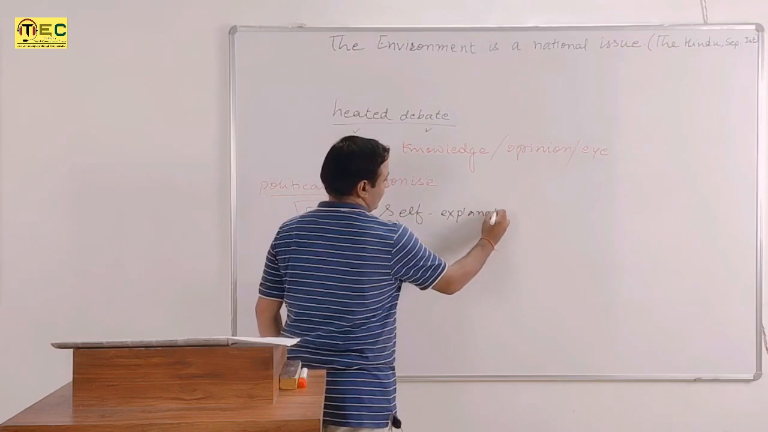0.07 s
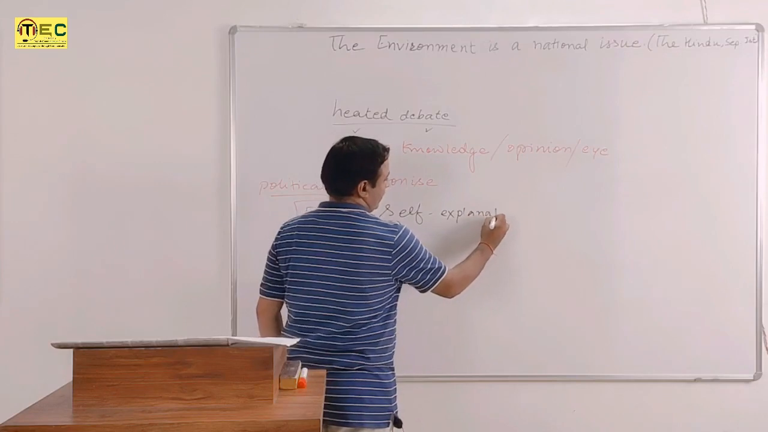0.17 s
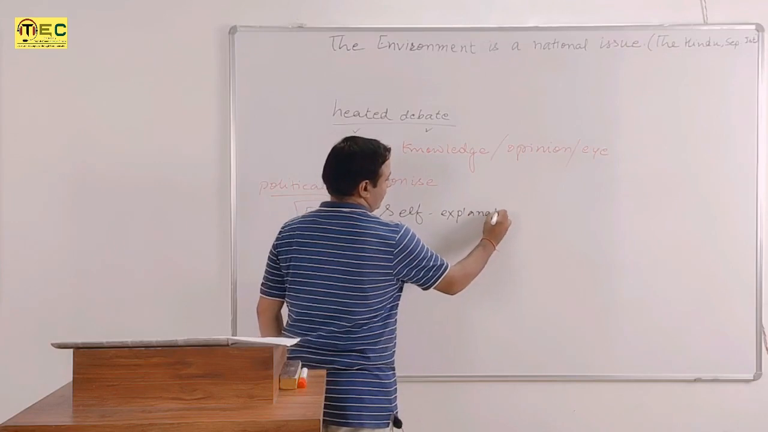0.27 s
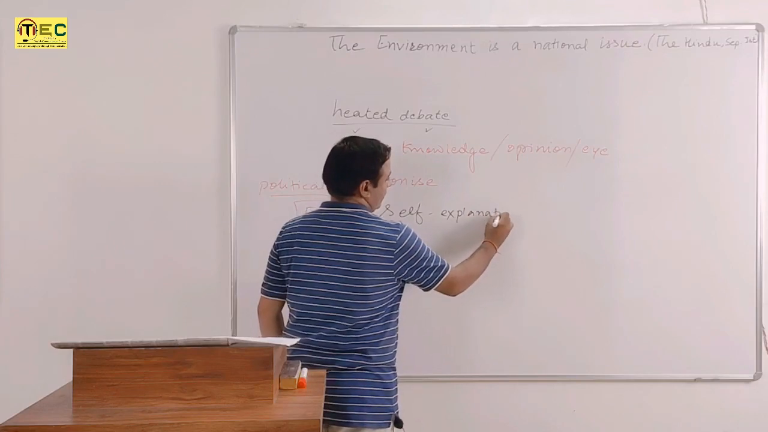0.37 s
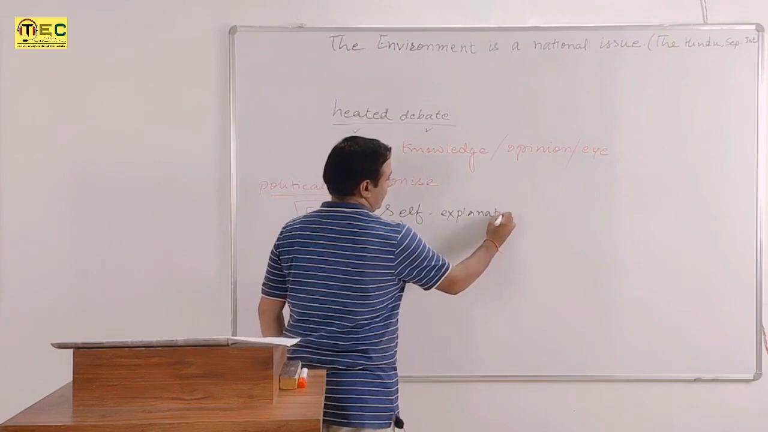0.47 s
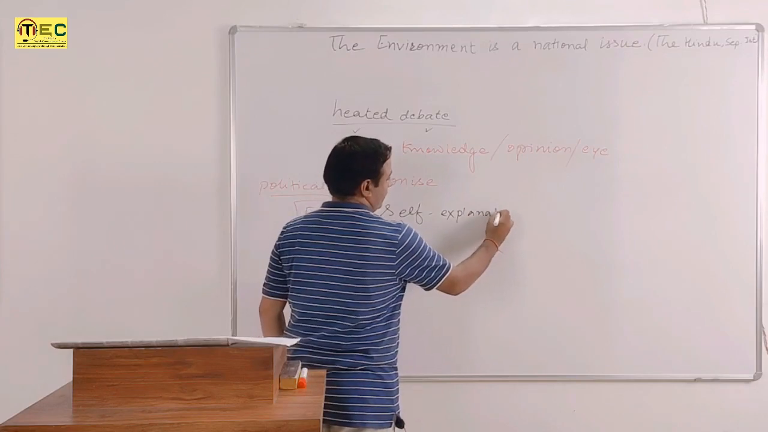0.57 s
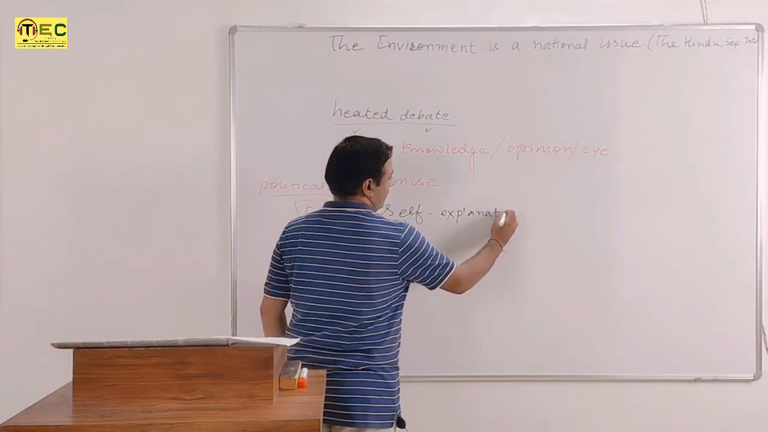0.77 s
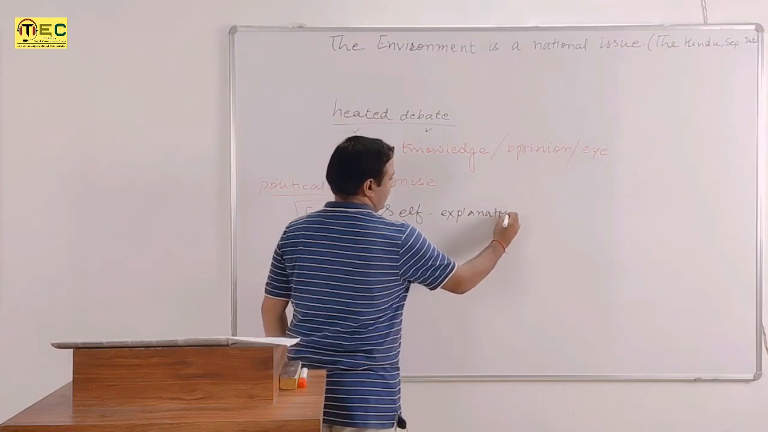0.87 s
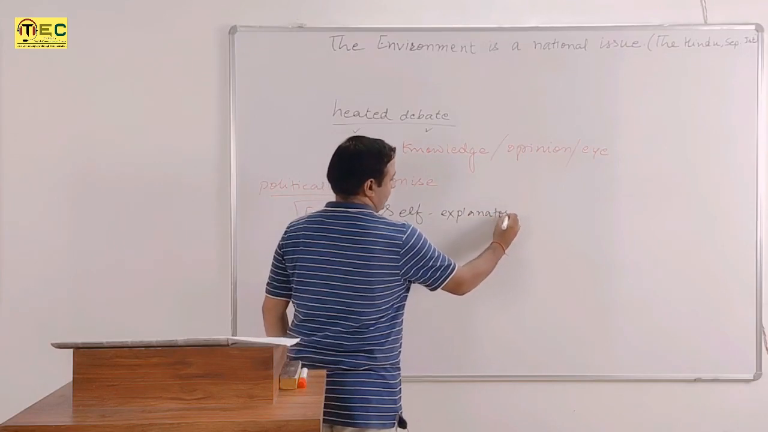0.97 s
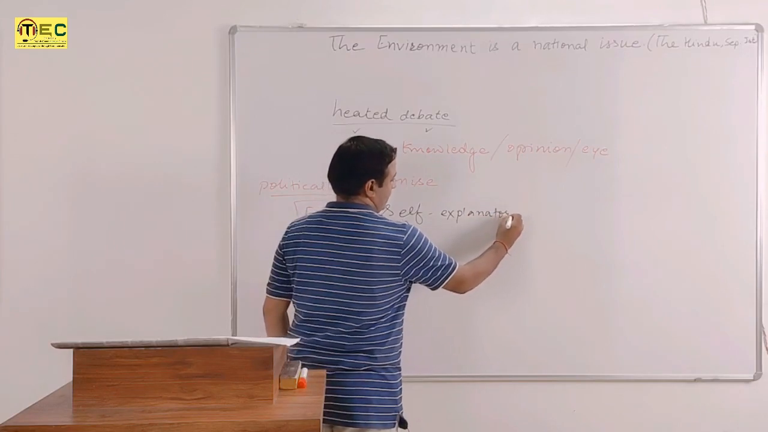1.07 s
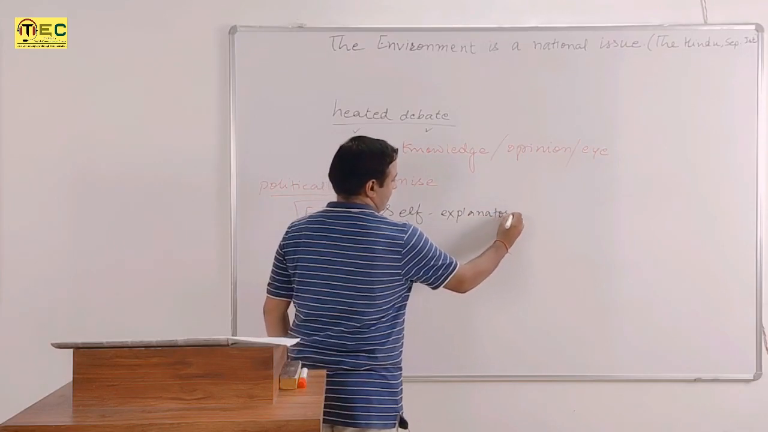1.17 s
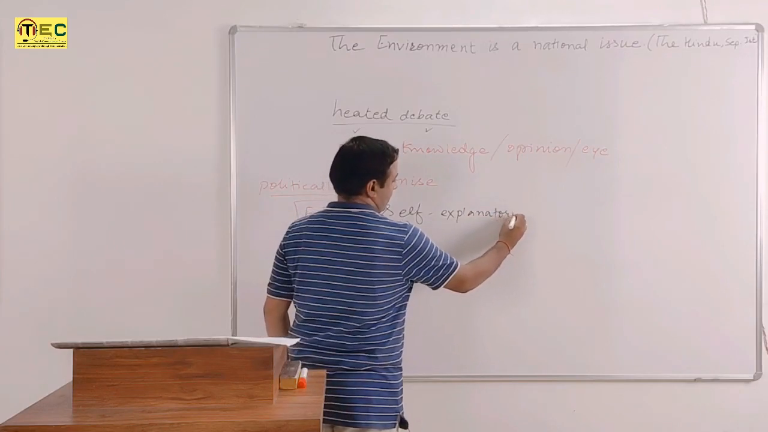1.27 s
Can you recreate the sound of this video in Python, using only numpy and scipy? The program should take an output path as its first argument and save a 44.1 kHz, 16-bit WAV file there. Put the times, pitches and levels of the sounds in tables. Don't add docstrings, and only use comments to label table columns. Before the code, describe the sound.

A felt marker writes on a whiteboard in a quiet room. A faint scratch opens; at 0.2 s the hand knocks the board with a low hollow thump, followed by a sharp plastic click at 0.25 s and soft bumps until 0.4. A light tick and scratch come at 0.5, stronger gritty strokes at 0.65-0.87, fainter ones at 0.95 and 1.29. Wavering electrical buzz and low microphone rumble lie beneath.

```python
import sys
import numpy as np
from scipy import signal
from scipy.fft import rfft, irfft, next_fast_len
from scipy.io import wavfile
from scipy.ndimage import uniform_filter1d, map_coordinates

SR = 44100
rng = np.random.default_rng(int(sys.argv[2]) if len(sys.argv) > 2 else 0)


def convert_level_to_amplitude(level_db):
    exponent = np.asarray(level_db, float) / 20
    return 10 ** exponent


def dump(signal):
    limited = np.clip(np.atleast_2d(signal).T, -1, 1)
    pcm = np.round(limited * 32767).astype(np.int16)
    wavfile.write(sys.argv[1], SR, pcm)


N = 57330


def unit(x):
    return x / np.sqrt(np.mean(x ** 2) + 1e-20)


def along(points, hz):
    f, v = np.transpose(points)
    return np.interp(np.log(hz + 1), np.log(f + 1), v)


def wobble(rate):
    return map_coordinates(rng.standard_normal(N // 16), [np.arange(N) * rate / SR])


def filtered(x, response):
    m = next_fast_len(N + SR // 2)
    return irfft(rfft(x, m) * response(np.fft.rfftfreq(m, 1 / SR)), m)[..., :N]


def resonant(x, peaks, order=3):
    def one_pass(f):
        total = 0
        for k, (centre, width, db) in enumerate(peaks):
            band = 1j * f * width / (centre * centre - f * f + 1j * f * width)
            total = total + (-1) ** k * convert_level_to_amplitude(db / order) * band
        return total

    return filtered(x, lambda f: one_pass(f) ** order)


def swell(peak, db, rise, fall):
    t = np.arange(N) / SR - peak
    return convert_level_to_amplitude(db) * np.where(t < 0, np.exp(-2 * (t / rise) ** 2), convert_level_to_amplitude(-60 * np.abs(t) / fall))


def bursts(rows):
    total = np.zeros(N)
    for s, db, hz, length in rows:
        t = np.arange(N) / SR - s
        total += convert_level_to_amplitude(db) * np.cos(2 * np.pi * hz * t) * np.exp(-(t / length) ** 2)
    return total


def room(x):
    # f/Hz, t60/s
    decay = [(200, 1), (2000, 0.1), (10000, 0.05)]
    hz, t, z = signal.stft(rng.standard_normal(SR // 2), SR, nperseg=256)
    tail = signal.istft(z * convert_level_to_amplitude(-60 * t / along(decay, hz)[:, None]), SR, nperseg=256)[1]
    return signal.fftconvolve(np.pad(x, (200, 0)), tail / np.linalg.norm(tail))[:N]


def room_air():
    # f/Hz, level/dB per Hz
    colour = [(53, -40), (90, -13), (360, -11), (690, -17.5), (1020, -19), (1320, -21.5), (1750, -25.5),
              (7330, -33.5), (16000, -39)]
    z = signal.stft(rng.standard_normal(N), nperseg=512)[2]
    patches = uniform_filter1d(uniform_filter1d(rng.standard_normal(z.shape), 10, 0), 8, 1)
    air = signal.istft(z * convert_level_to_amplitude(1.2 * unit(patches)), nperseg=512)[1][:N]
    return convert_level_to_amplitude(-69.5) * unit(filtered(air, lambda hz: convert_level_to_amplitude(along(colour, hz))))


def handling_rumble():
    # t/s, level/dB
    ride = [(0.0, -87), (0.038, -65), (0.108, -70.5), (0.14, -55), (0.188, -81), (0.225, -55.5),
            (0.306, -54), (0.34, -66.5), (0.488, -68.5), (0.524, -68.5), (0.63, -76.5), (0.72, -66.5),
            (0.934, -77.5), (1.038, -65), (1.064, -63.5), (1.14, -62.5), (1.274, -64), (1.3, -89)]
    # f/Hz, level/dB
    colour = [(10, -14.5), (25, 1), (40, -9), (70, -11), (110, -15), (200, -25), (400, -105)]
    s, db = np.transpose(ride)
    low = unit(filtered(rng.standard_normal(N), lambda hz: convert_level_to_amplitude(along(colour, hz))))
    return low * convert_level_to_amplitude(np.interp(np.arange(N) / SR, s, db))


def stand_shakes():
    # t/s, level/dB, f/Hz, length/s
    thuds = [
        (.249, -43.5, 34, .022),
        (.2575, -53, 72, .016),
        (.3, -43, 35, .0055),
        (1.075, -53.5, 31, 0.033),
        (1.132, -48.5, 29.6, 0.0085),
    ]
    return bursts(thuds)


def mains_buzz():
    # peak t/s, level/dB, rise/s, fall t60/s, centre f/Hz
    swells = [(0.036, -75.5, 0.053, 0.73, 1250), (.12, -78, 0.05, 0.32, 1200),
              (.22, -59.5, 0.063, 0.17, 904), (0.205, -75, 0.05, 0.46, 1000),
              (0.233, -68, 0.0088, 0.069, 1135), (0.56, -73.5, 0.066, 0.93, 1164),
              (0.703, -67, 0.067, 0.18, 917), (1.063, -63, 0.016, 0.1, 1105),
              (1.063, -71.5, 0.022, .3, 1200), (1.097, -62, 0.0072, 0.17, 1100),
              (1.097, -68, 0.01, 0.17, 1200), (1.097, -62, 0.015, 0.072, 1260),
              (1.13, -74, .015, 0.17, 1290), (1.2, -79, 0.03, 0.14, 1400), (1.172, -62.5, 0.043, 0.2, 900),
              (1.188, -67, 0.039, 0.076, 1040), (1.182, -78, 0.01, 0.055, 1290), (1.154, -74, .04, .3, 600),
              (1.178, -62, 0.034, 0.054, 287)]
    t = np.arange(N) / SR
    hz = 100.1 * np.arange(1, 15)[:, None]
    level = convert_level_to_amplitude(-97.5)
    for s, db, rise, fall, centre in swells:
        group = np.exp(-((hz - centre) / 47.4) ** 2 / 2)
        level = level + swell(s, db, rise, fall) * group
    level = level * convert_level_to_amplitude([2.5 * wobble(29.91) for _ in hz])
    start = 0.25 * rng.standard_normal(hz.shape)
    return (level * np.sin(2 * np.pi * (hz * t + start))).sum(0)


def whine():
    t = np.arange(N) / SR
    return convert_level_to_amplitude(-76) * np.exp(-((t - .032) / .014) ** 2) * np.sin(2 * np.pi * 15500 * t)


def muffled_bumps():
    # t/s, level/dB, f/Hz, length/s
    bumps = [(.188, -61, 320, .006), (.2087, -37, 330, .0025), (.3255, -53, 345, .008),
             (.353, -47.5, 309, .016), (.357, -62, 500, .007), (.318, -64, 560, .01),
             (.388, -56, 325, .012), (.264, -55, 520, .008), (.3, -55, 425, .008), (.35, -60, 400, .008),
             (.225, -64, 715, .015), (.27, -57, 155, .012)]
    return bursts(bumps)


def hand_knock():
    # f/Hz, level/dB, t60/s, side the mode first swings to
    modes = [(250.3, -7, .22, -1), (285.6, -2, .15, -1), (306.3, 1, .49, -1), (321.4, -1, .15, 1),
             (351.8, -2.5, .19, -1), (374.2, -3, .2, 1), (401.7, 1, .13, 1), (416.3, -15, .5, 1),
             (432, -21, .4, -1), (481.4, -18, .39, -1), (553, -9, .16, 1), (609.6, -24, .2, 1),
             (710, -30, .2, 1)]
    knock_s, knock_db = .20923, -33
    rest_s, damp_t60_s = .304, .14
    rise_s, press_s = .0051, .0033
    room_db, room_t60_s = -22, .9
    t = np.arange(N) / SR - knock_s
    since = np.maximum(t, 0)
    ring = np.zeros(N)
    for hz, db, t60, side in modes:
        ring += side * convert_level_to_amplitude(db - 60 * since / t60) * np.cos(2 * np.pi * hz * t)
    landing = np.exp(-2 * (np.minimum(t - press_s, 0) / rise_s) ** 2)
    damping_db = -60 * np.maximum(t + knock_s - rest_s, 0) / damp_t60_s
    blow = convert_level_to_amplitude(knock_db + damping_db) * landing * ring
    return blow + convert_level_to_amplitude(room_db - 60 * since / room_t60_s) * room(blow)


def ticks():
    # t/s, level/dB, f/Hz, length/s
    taps = [(.0295, -57, 8600, .0006), (.0295, -60, 13500, .00008), (.040, -64, 14000, .0002),
            (.2317, -56, 3800, .0007), (.2463, -42, 2900, .0016), (.3125, -59, 1800, .0018),
            (.497, -48, 7800, .001), (.3125, -56, 2300, .00025), (.5672, -49, 1700, .00025),
            (.5682, -62, 1500, .0005), (.5693, -58, 1900, .0006), (.566, -60, 900, .0008),
            (.5725, -63, 3000, .001), (.4845, -58, 7000, .0003), (.5175, -56, 7500, .0006),
            (.2458, -45, 5900, .0012), (.2548, -52, 7000, .0006), (.2468, -48, 4350, .0015),
            (.6655, -55, 7300, .002), (.851, -60, 2100, .002), (.936, -58, 6000, .0007),
            (1.29, -59, 2350, .0012)]
    return bursts(taps)


def barrel_snap():
    # t/s, level/dB
    impulses = [
        (.2452, -35),
        (.246, -27),
        (.2469, -36),
        (.2479, -28.5),
    ]
    # f/Hz, width/Hz, level/dB
    barrel = [(4470, 3000, -5.5), (5650, 370, 2.5), (7240, 330, 6.5), (8640, 420, 2), (10100, 1500, -8.5),
              (11730, 1100, -6.5), (13500, 1800, -17), (14300, 1600, -22)]
    blows = np.zeros(N)
    for s, db in impulses:
        blows[round(s * SR)] = convert_level_to_amplitude(db + 13.5)
    return resonant(np.diff(blows, prepend=0), barrel, order=1)


def friction(rows, low, high):
    grit_db, judder_db, judder_per_s = 2.5, 2, 110
    grains = rng.standard_normal((2, N)) * convert_level_to_amplitude(grit_db * rng.standard_normal((2, N)))
    lower = unit(resonant(grains[0], low))
    upper = unit(resonant(grains[1], high))
    grip = convert_level_to_amplitude(judder_db * (wobble(judder_per_s) + 0.7 * wobble(3 * judder_per_s)))
    total = np.zeros(N)
    for s, db, rise, fall, upper_db in rows:
        total += swell(s, db, rise, fall) * (lower + convert_level_to_amplitude(upper_db) * upper)
    return grip * total


def panel_rub():
    # peak t/s, level/dB, rise/s, fall t60/s, upper over lower band/dB
    rubs = [(.27, -78.5, 0.088, 0.47, 8), (.48, -73, 0.02, 0.34, -3.5), (.575, -72.5, 0.025, 0.6, -10),
            (.65, -69, 0.035, 0.34, 1), (.682, -64, 0.024, 0.19, -0.5), (.703, -67, 0.007, 0.14, -3.5),
            (.745, -74.5, 0.024, 0.47, 3), (.83, -69.5, 0.018, 0.17, 0.5), (.865, -63.5, 0.031, 0.11, -8.5),
            (.96, -78, 0.082, 1, -1), (1.288, -76, 0.026, 0.14, 0.5)]
    # f/Hz, width/Hz, level/dB
    low = [(529, 201, -1), (1016, 272, 4), (1445, 524, 5), (1834, 325, 11.5), (2344, 560, -5)]
    high = [(2530, 400, -18), (3106, 343, 5.5), (3670, 840, -3.5), (4940, 1300, -13.5)]
    return friction(rubs, low, high)


def stroke_sheen():
    # peak t/s, level/dB, rise/s, fall t60/s, upper over lower band/dB
    bright = [(.042, -78, 0.017, 0.18, -14), (.24, -71.5, 0.033, 0.6, -4), (.496, -71.5, 0.025, 0.27, -3),
              (.655, -70, 0.029, 0.28, -26), (.754, -71, 0.01, 0.23, -20), (.84, -91, 0.028, 0.13, -1),
              (.95, -95, .02, 0.27, 2), (1.035, -75.5, 0.03, 0.099, -8), (1.288, -78, 0.02, 0.14, -11)]
    # f/Hz, width/Hz, level/dB
    low = [(9900, 1000, -4.5), (10990, 740, 2.5), (11710, 1150, -6)]
    high = [(12800, 1200, 0), (14000, 1300, -1), (15200, 1200, -1)]
    return friction(bright, low, high)


def tip_strokes():
    # peak t/s, level/dB, rise/s, fall t60/s, upper over lower band/dB
    strokes = [(.042, -66, 0.025, 0.25, 2), (.235, -60, 0.024, 0.27, -2.5), (.278, -65, 0.029, 0.45, -19),
               (.47, -74.5, 0.015, 0.34, 3), (.497, -67.5, 0.016, 0.22, 1), (.585, -80, 0.017, 0.16, -11),
               (.62, -72, 0.0089, 0.48, -16), (.664, -56, 0.03, 0.21, -14.5), (.754, -58, 0.031, 0.3, -13),
               (.812, -68, 0.012, 0.35, -18), (.86, -80, 0.044, 0.12, -34),
               (.95, -66.5, 0.034, 0.53, -13.5), (1.035, -87, 0.066, 0.034, 6.5),
               (1.18, -78.5, 0.07, 0.9, -14), (1.288, -67, 0.023, 0.12, -4.5)]
    # f/Hz, width/Hz, level/dB
    low = [(5340, 1290, -7), (6273, 707, 8), (6867, 790, -0.5), (7550, 386, -6.5)]
    high = [(7870, 860, 0.5), (8660, 410, 6.5), (9146, 450, 0.5)]
    return friction(strokes, low, high)


def scene():
    background = room_air() + handling_rumble() + stand_shakes() + mains_buzz() + whine()
    hand = muffled_bumps() + hand_knock()
    pen = ticks() + barrel_snap() + panel_rub() + stroke_sheen() + tip_strokes()
    return (background + hand + pen + convert_level_to_amplitude(-14) * room(pen))[None]


def suppressor(x):
    # t/s, level/dB, width/s
    dips = [
        (0, -7.5, 0.033),
        (0.127, -3.5, 0.063),
        (0.429, -3, 0.049),
        (0.915, -10, 0.019),
        (1.023, -6.5, 0.03),
    ]
    t = np.arange(N) / SR
    return x * convert_level_to_amplitude(sum(db * np.exp(-((t - s) / width) ** 2) for s, db, width in dips))


def low_pass(x):
    return signal.sosfilt(signal.butter(12, 16480, fs=SR, output="sos"), x)


def record(dry):
    mix = filtered(suppressor(dry), lambda hz: 1 / (1 + (hz / 15850) ** 120))
    return low_pass(mix)


dry = scene()
out = record(dry)
dump(out)
```